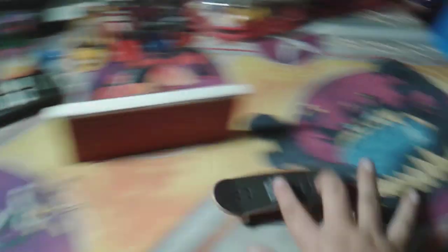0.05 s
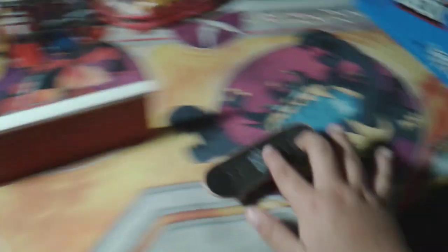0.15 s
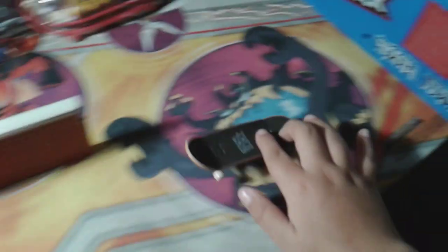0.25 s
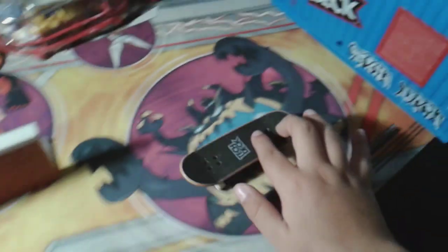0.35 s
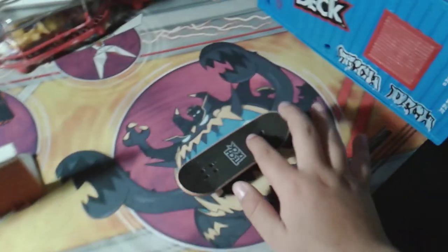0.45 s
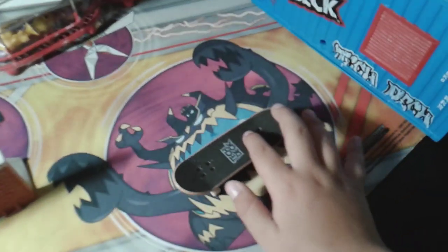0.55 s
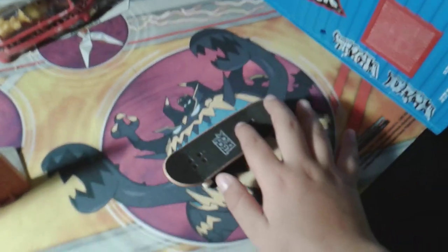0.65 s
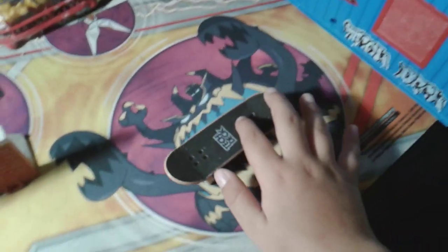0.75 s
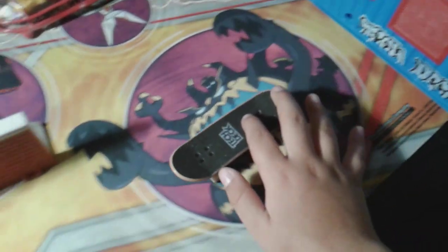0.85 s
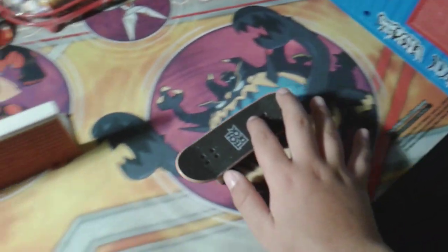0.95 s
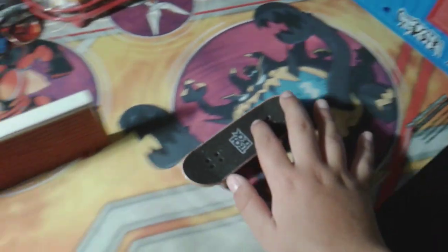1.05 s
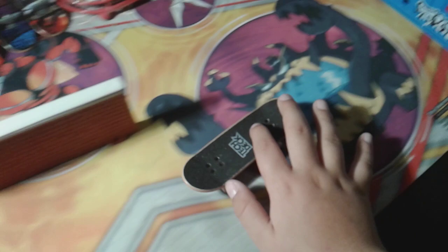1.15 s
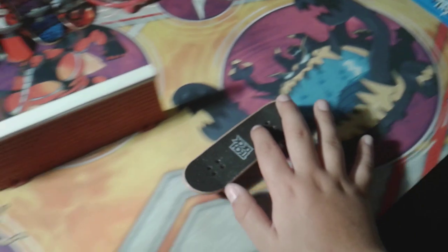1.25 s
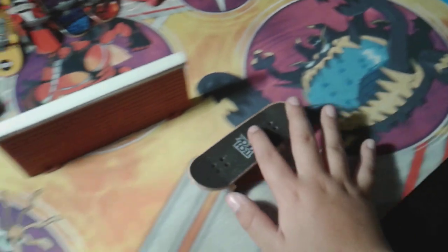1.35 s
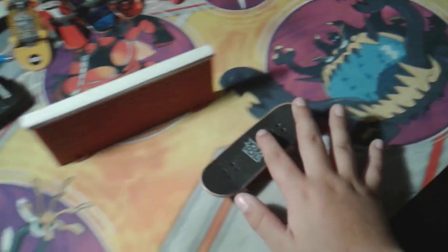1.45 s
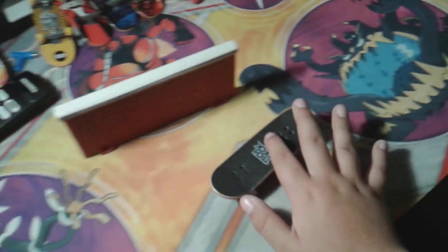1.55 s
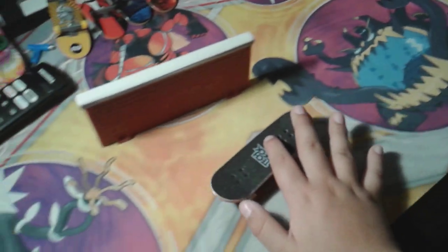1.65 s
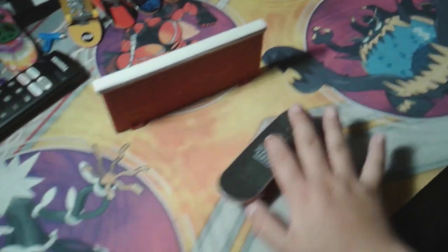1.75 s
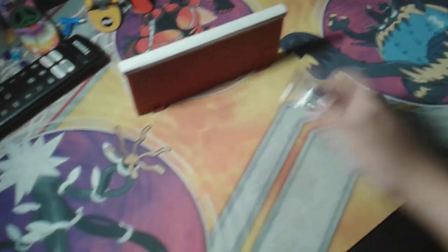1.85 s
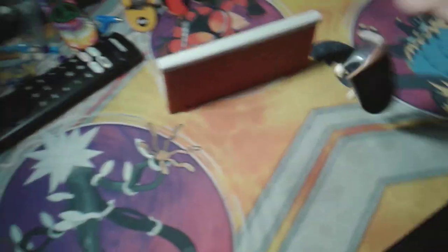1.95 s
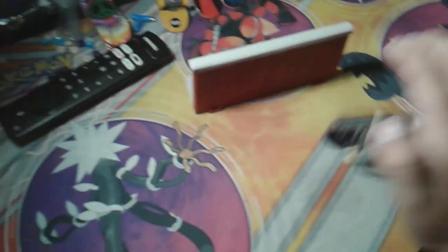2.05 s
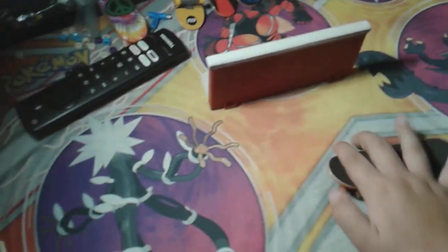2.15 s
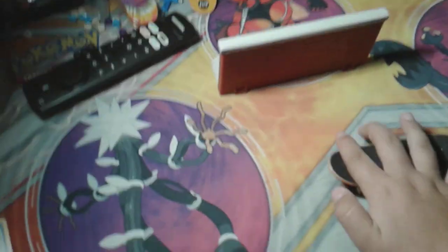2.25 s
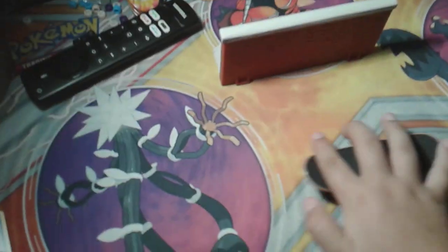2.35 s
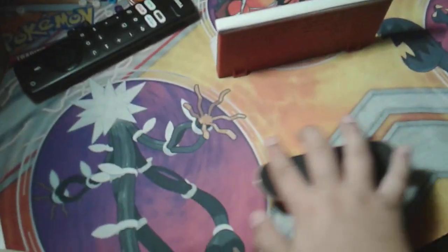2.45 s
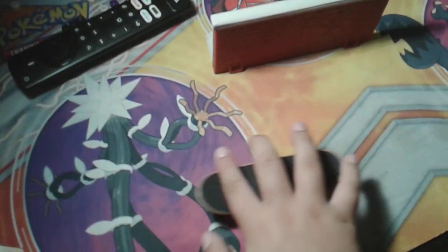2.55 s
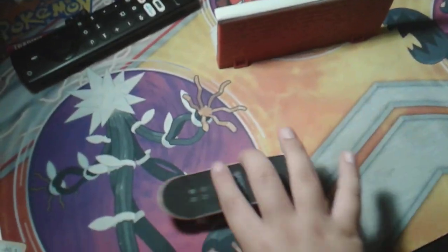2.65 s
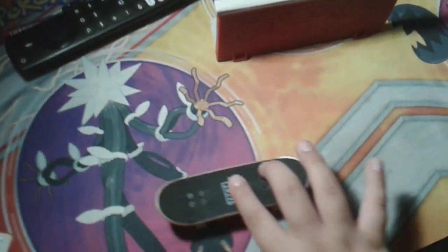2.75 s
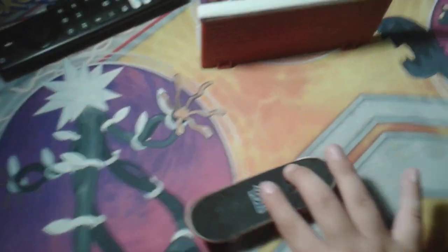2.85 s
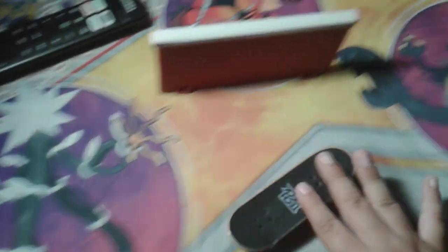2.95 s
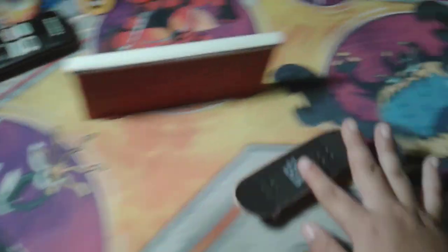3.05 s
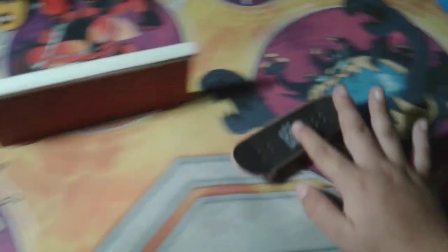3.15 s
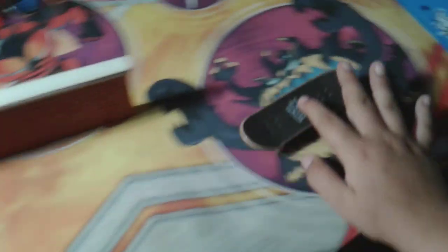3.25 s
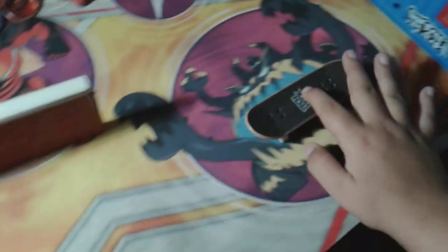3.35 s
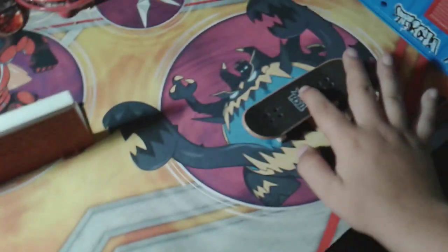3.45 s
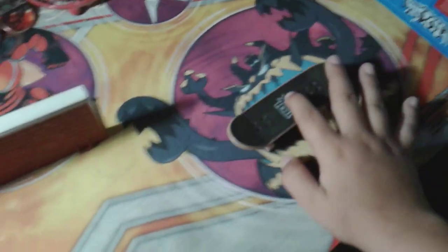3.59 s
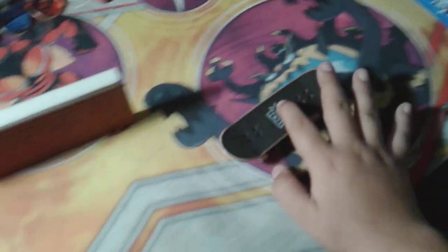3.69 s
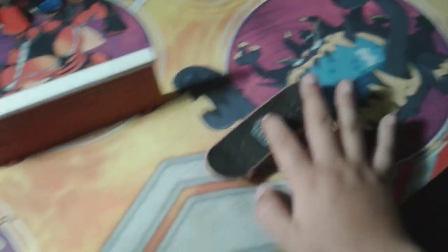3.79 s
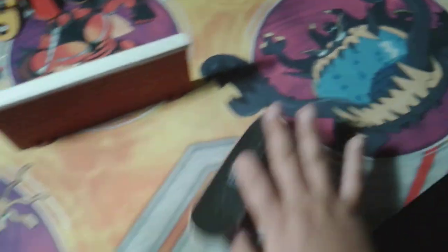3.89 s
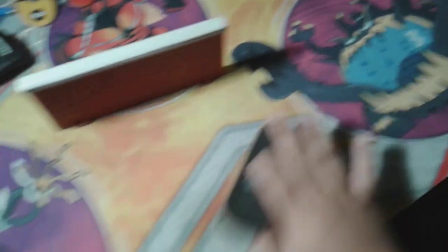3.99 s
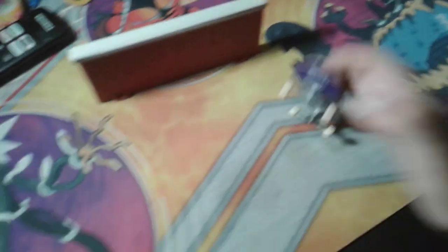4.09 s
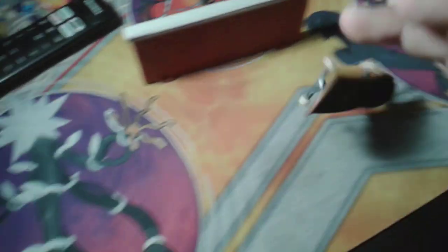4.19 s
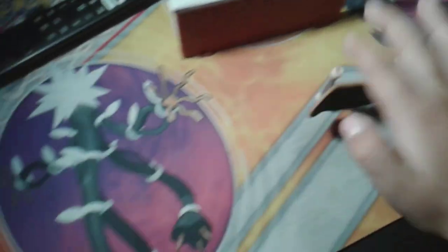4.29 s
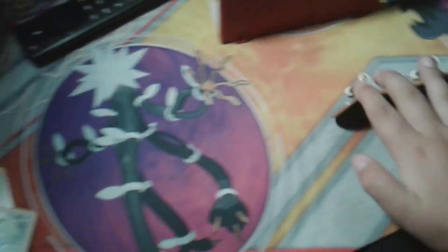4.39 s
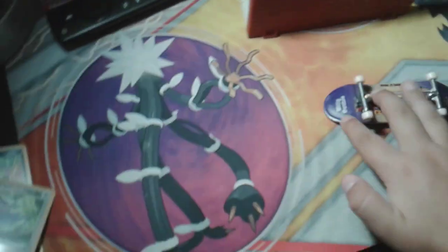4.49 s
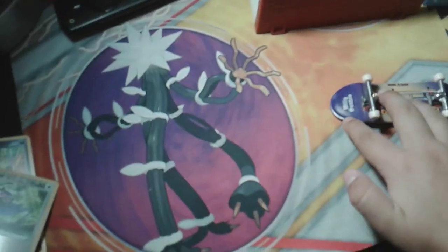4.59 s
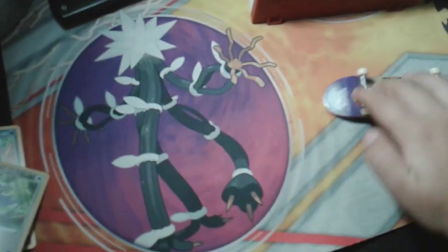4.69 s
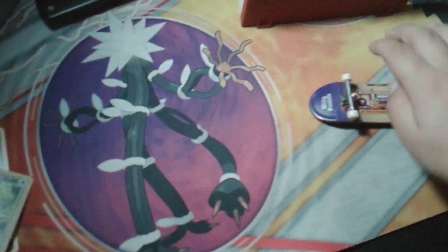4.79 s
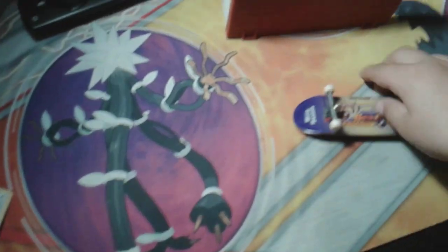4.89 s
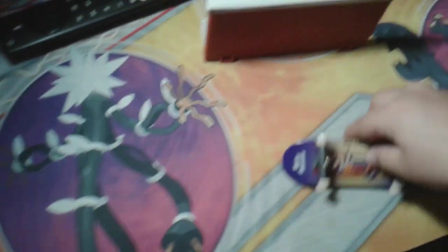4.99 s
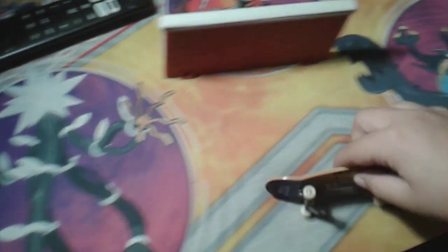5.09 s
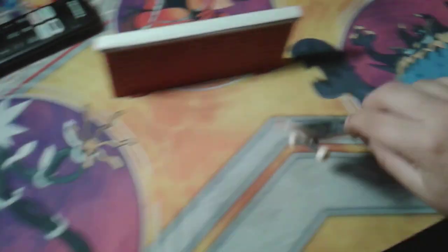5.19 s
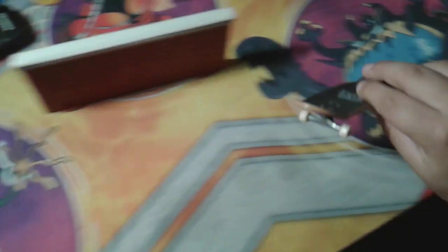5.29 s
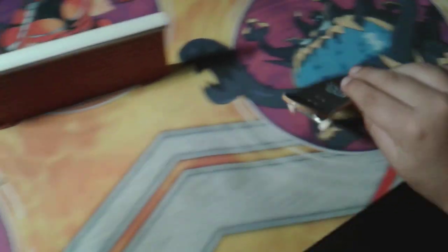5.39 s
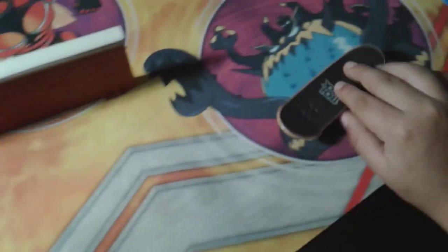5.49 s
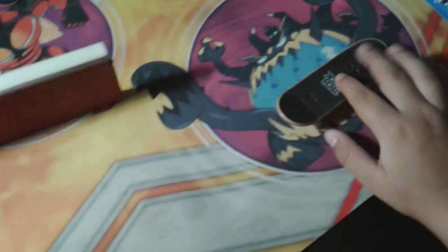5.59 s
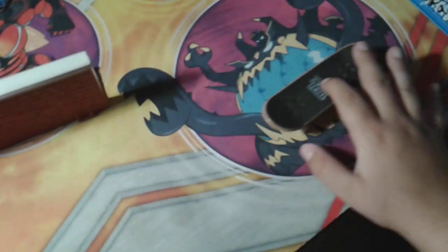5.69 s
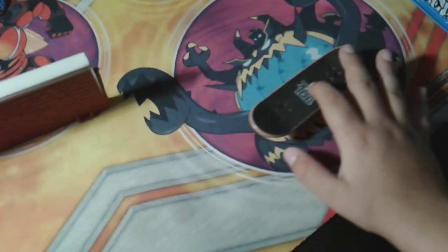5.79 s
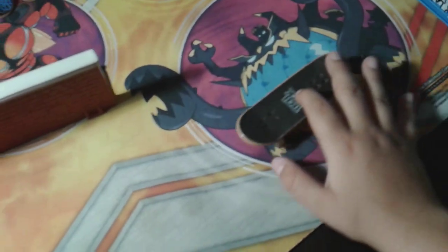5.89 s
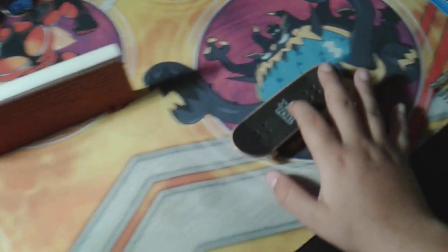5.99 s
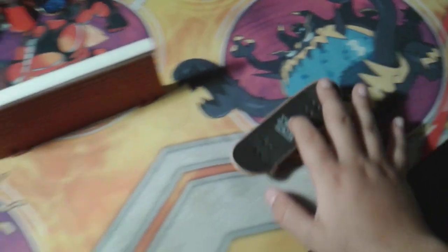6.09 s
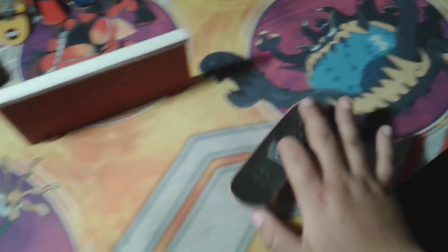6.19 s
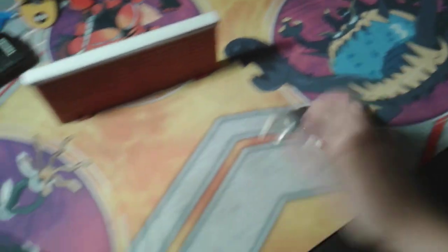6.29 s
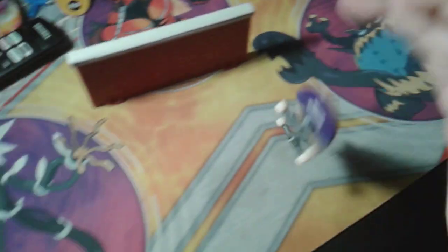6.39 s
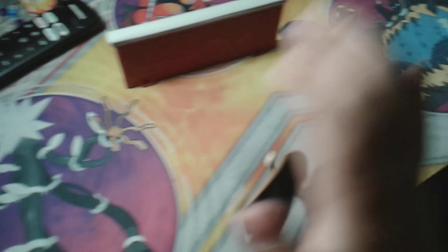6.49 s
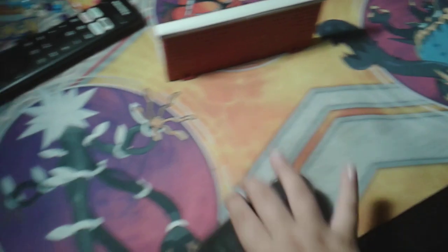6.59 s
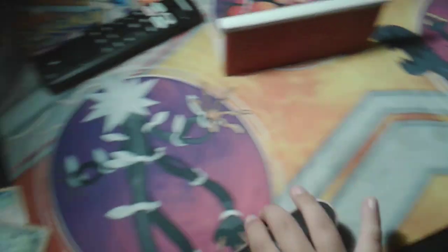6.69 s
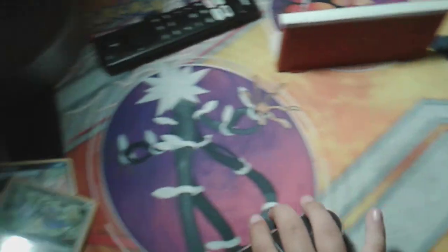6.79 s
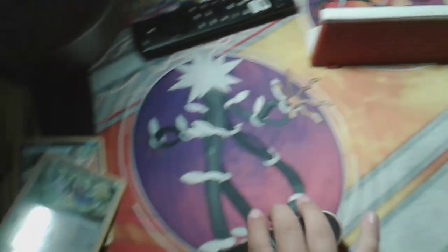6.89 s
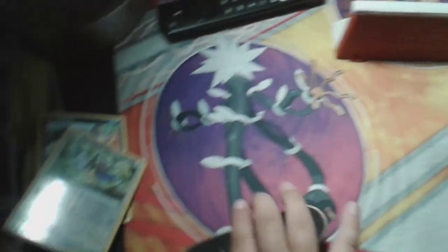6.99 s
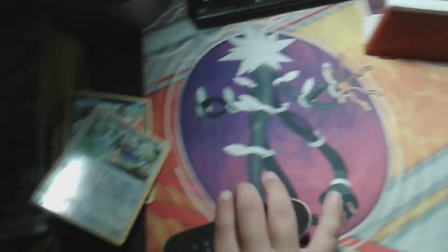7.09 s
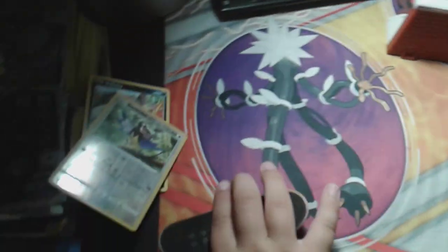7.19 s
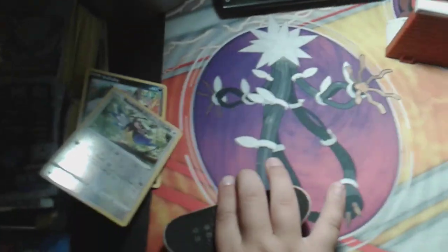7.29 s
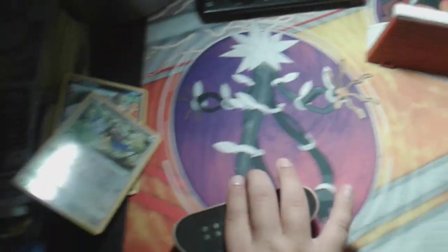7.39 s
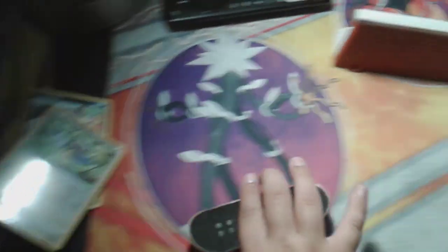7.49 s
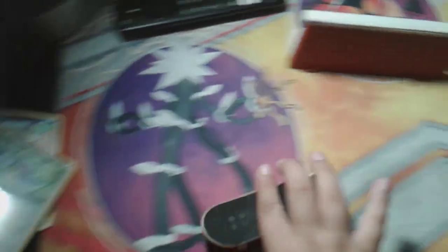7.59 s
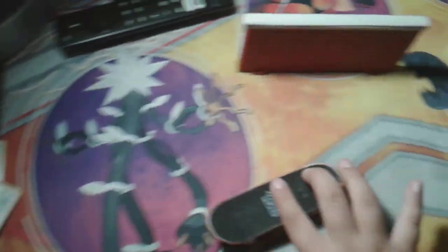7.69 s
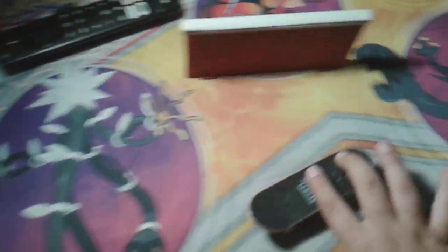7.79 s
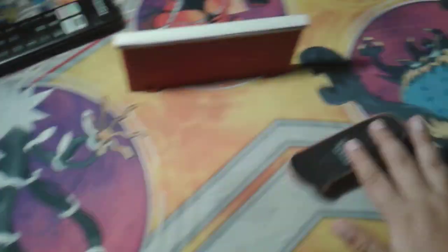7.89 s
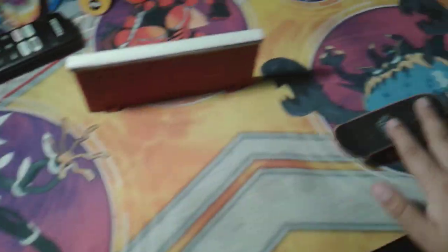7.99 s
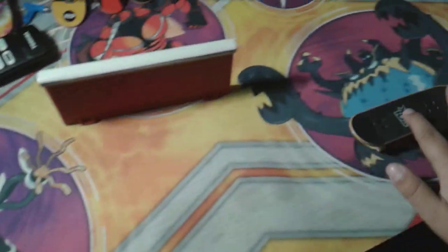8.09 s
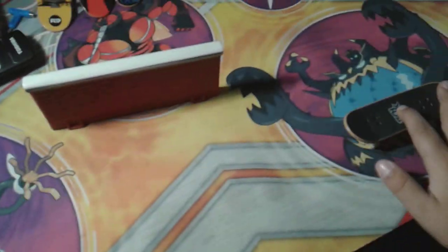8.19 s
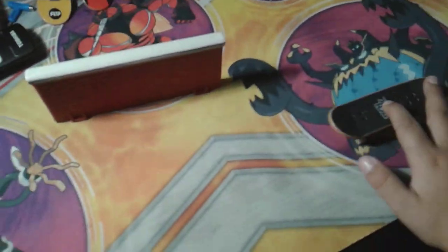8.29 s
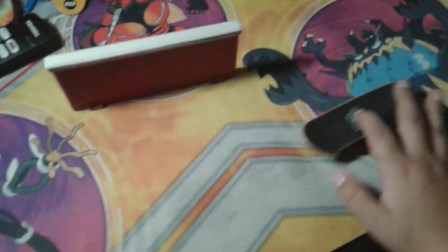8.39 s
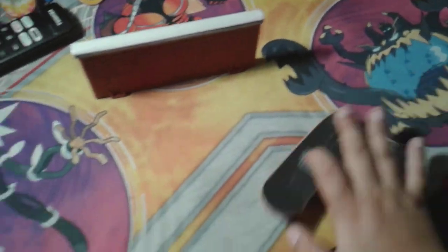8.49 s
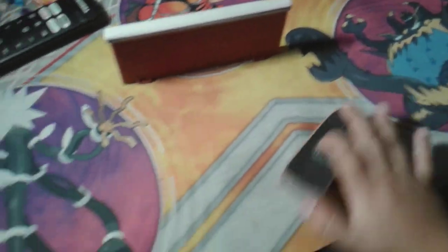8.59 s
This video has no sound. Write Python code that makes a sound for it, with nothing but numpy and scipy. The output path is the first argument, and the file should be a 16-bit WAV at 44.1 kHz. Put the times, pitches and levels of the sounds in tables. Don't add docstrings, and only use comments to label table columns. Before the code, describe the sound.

A small plastic toy skateboard is rolled, popped and dropped by fingers on a rubber mat over a wooden table. Faint rasping rolls and ticks come first, then a crisp double clack, later a louder, brighter landing, and a third rapid clatter. Softer scraping and one wheel rub end it. Close phone microphone, mono-like, small quiet room with low hum and light hiss.

```python
import sys
import numpy as np
from scipy import signal
from scipy.fft import rfft, irfft
from scipy.io import wavfile
from scipy.ndimage import uniform_filter1d

SR = 44100
rng = np.random.default_rng(int(sys.argv[2]) if len(sys.argv) > 2 else 0)


def ratio(d):
    e = np.asarray(d, float) / 20
    return 10 ** e


def wav_out(sig):
    wavfile.write(sys.argv[1], SR, np.round(np.clip(np.atleast_2d(sig).T, -1, 1) * 32767).astype(np.int16))


N = 381465

# pitch_hz, level_db, t60_s
THUD_MODES = [(102, -2.5, 0.045), (129.2, 5, 0.088), (148, -10, 0.03), (242.5, -13.5, 0.084)]
# pitch_hz, level_db (per Hz)
CRACK_COLOUR = [(1470, -30), (2500, -9), (4700, -8.5), (6920, 3), (7730, -3), (10000, -14.5),
                (11700, -16.5), (12500, -21.5), (15000, -19), (15900, -22.5), (16500, -43)]


def rms_one(x):
    return x / np.sqrt(np.mean(x ** 2) + 1e-20)


def band_pass(x, low_hz, high_hz):
    return signal.sosfilt(signal.butter(2, [low_hz, high_hz], "band", fs=SR, output="sos"), x)


def high_pass(x, hz, order=2):
    return signal.sosfilt(signal.butter(order, hz, "high", fs=SR, output="sos"), x)


def in_time(rows):
    s, *columns = np.transpose(rows)
    t = np.arange(N) / SR
    return np.array([np.interp(t, s, c, left=-200, right=-200) for c in columns])


def colour(x, spectrum):
    size = 4096
    hz, db = np.transpose(spectrum)
    bins_hz = np.arange(size // 2 + 1) * SR / size
    gain = ratio(np.interp(np.log(bins_hz + 1), np.log(hz), db))
    cepstrum = irfft(np.log(gain + 1e-6))
    cepstrum[1:size // 2] *= 2
    cepstrum[size // 2 + 1:] = 0
    response = irfft(np.exp(rfft(cepstrum)))
    return signal.fftconvolve(x, response / np.linalg.norm(response))[:len(x)]


def drift(rate_hz):
    r = np.exp(-2 * np.pi * rate_hz / SR)
    noise = rng.standard_normal(N + SR)
    return rms_one(signal.lfilter([1], [1, -2 * r, r * r], noise)[SR:])


def ring(clicks, hz, t60):
    r, w = ratio(-60 / (t60 * SR)), 2 * np.pi * hz / SR
    return signal.lfilter([0, np.sin(w)], [1, -2 * r * np.cos(w), r * r], clicks + 1e-18)


def resonate(x, peaks):
    out = 0
    for k, (hz, width_hz, db) in enumerate(peaks):
        r, w = np.exp(-np.pi * width_hz / SR), 2 * np.pi * hz / SR
        band = signal.lfilter([(1 - r * r) / 2, 0, (r * r - 1) / 2], [1, -2 * r * np.cos(w), r * r], x)
        flare_db = 3 * drift(28)
        out = out + (-1) ** k * ratio(db + flare_db) * band
    return rms_one(out)


def grit(per_s, spread_db):
    sizes = ratio(spread_db * np.minimum(rng.exponential(1, N), 4)) * rng.choice([-1, 1], N)
    return rms_one(sizes * (rng.random(N) < per_s / SR))


def through_deck(burst):
    return 1.26 * band_pass(burst, 900, 4000)


def contacts():
    # start_s, crack_db, thud_db, wood_ring_db, deck_edge_db
    blow_events = [(0.4622, -43.5, -41, -52.5, -52), (0.5025, -64, -46.5, -48.5, -51),
                   (1.943, -49.5, -34.5, -43, -44), (2.1544, -41.5, -30.5, -39.5, -52),
                   (2.1846, -23, -29.5, -30, -27.5), (2.2446, -26.5, -38, -57, -34),
                   (2.262, -35, -40, -61, -42), (4.1553, -41, -40.5, -43, -43),
                   (4.326, -40.5, -47, -41, -46), (4.357, -25.5, -30.5, -23.5, -31),
                   (4.4388, -14.5, -22, -18, -37), (4.5216, -43, -48.5, -45, -50),
                   (4.546, -42, -64, -44, -44), (4.5611, -37.5, -40, -45, -46.5),
                   (5.5957, -36.5, -40, -47, -54.5), (5.6404, -44, -41.5, -61.5, -54),
                   (6.406, -39, -35.5, -40, -52), (6.6055, -35, -33, -40, -44.5),
                   (6.6547, -28, -27.5, -36, -35), (6.714, -30, -44, -56, -48),
                   (6.7243, -20, -27, -29, -23.5), (6.7399, -28, -41.5, -52.5, -49),
                   (6.792, -44.5, -51.5, -56, -44), (8.0581, -47.5, -46, -48.5, -42)]
    # start_s, crack_db, wood_db
    click_events = [(0.5419, -56.5, -65), (1.556, -59, -59), (1.999, -50.5, -58), (2.301, -50, -57.5),
                    (4.001, -53.5, -59.5), (4.216, -56, -58.5), (4.5982, -43.5, -62),
                    (5.0255, -57.5, -62.5), (5.1315, -56, -73), (5.166, -59, -61.5), (5.4812, -50, -62),
                    (5.5103, -50, -67), (5.522, -39.5, -55.5), (6.4578, -52, -59), (6.6763, -34.5, -47),
                    (6.7007, -40.5, -64), (6.821, -45.5, -65), (6.866, -50, -60), (6.9577, -51.5, -66)]
    # start_s, thud_db, deck_edge_db
    bump_events = [(1.418, -51.5, -66), (1.536, -47.5, -54), (2.8406, -51.5, -77), (4.9614, -36.5, -54.5),
                   (7.556, -49.5, -67), (7.7903, -47.5, -77), (7.973, -49, -51), (8.075, -55, -45),
                   (8.398, -58, -76)]
    body_db, body_grows, hard_db = -21, 1.34, -23
    blows = [(s, crack, thud, wood, body_db + body_grows * (wood - hard_db), edge)
             for s, crack, thud, wood, edge in blow_events]
    clicks = [(s, crack, wood + 4.5, wood - 0.5, wood - 3, wood) for s, crack, wood in click_events]
    bumps = [(s, thud - 12, thud, thud - 24, thud - 21, edge) for s, thud, edge in bump_events]
    return np.array(sorted(blows + clicks + bumps))


def strike(modes, levels_db, spread_db, contact_s, lead_s):
    at = ((contacts()[:, 0] - lead_s) * SR).astype(int)
    luck, out = rng.standard_normal((len(at), len(modes))), np.zeros(N)
    for k, (hz, db, t60) in enumerate(modes):
        clicks = np.zeros(N)
        clicks[at] = ratio(levels_db + db + spread_db * luck[:, k])
        out += (-1) ** k * ring(clicks, hz, t60)
    soft = np.exp(-1 / (contact_s * SR))
    return signal.lfilter([(1 - soft) ** 2], [1, -2 * soft, soft * soft], out)


def chatter(levels_db, rise_s, t60):
    blows = np.zeros(N)
    blows[((contacts()[:, 0] - rise_s) * SR).astype(int)] = ratio(levels_db)
    t = np.arange(SR // 8) / SR
    shape = ratio(-60 * t / t60) * np.minimum(t / rise_s, 1) ** 2
    return np.abs(signal.fftconvolve(blows, shape)[:N]) * grit(per_s=14000, spread_db=5.5)


def knocks():
    # pitch_hz, level_db, t60_s
    edge_modes = [(1240, -3.5, 0.022), (1630, -3, 0.022), (1790, -5.5, 0.032), (2300, 5, 0.011),
                  (2600, -10, 0.074), (2550, -1.5, 0.02), (3240, -21.5, 0.031), (3959, -7.5, 0.012)]
    # pitch_hz, level_db, t60_s
    body_modes = [(636, -18, 0.08), (730, -1, 0.04), (809, -0.5, 0.069), (849, -6.5, 0.086),
                  (910, -9, 0.09), (1070, -6, 0.057), (1230, -9.5, 0.036)]
    # pitch_hz, level_db, t60_s
    wood_modes = [(315.6, -5.5, 0.16), (340, -1, 0.11), (451, -3.5, 0.089), (506, -15.5, 0.068)]
    s, crack_db, thud_db, ring_db, body_db, edge_db = contacts().T

    crack = colour(chatter(crack_db - 3.5, rise_s=0.00047, t60=0.035), CRACK_COLOUR)
    top = high_pass(crack, 3700)
    top_gain = ratio(np.minimum(0.26 * (crack_db + 29), 0))
    latest = np.maximum(np.searchsorted(s - 0.002, np.arange(N) / SR) - 1, 0)
    crack += top * (top_gain[latest] - 1)

    edge = strike(edge_modes, edge_db - 7.5, spread_db=5, contact_s=0.00003, lead_s=0.00161)
    edge += through_deck(chatter(edge_db - 2, rise_s=0.0029, t60=0.0069))

    body = strike(body_modes, body_db - 7.5, spread_db=4, contact_s=0.00006, lead_s=0.002)
    body += band_pass(chatter(body_db, rise_s=0.0015, t60=0.093), 420, 1400)

    table = strike(THUD_MODES, thud_db + 2, spread_db=3.5, contact_s=0.00031, lead_s=0.00061)
    table += strike(wood_modes, ring_db + 0.5, spread_db=1.5, contact_s=0.00026, lead_s=0.002)
    return crack + edge + body + table


def deck_notes():
    # start_s, peak_db, edge_hz, body_hz, snap_db
    knock_notes = [(0.462, -41.5, 3400, 613, -69), (1.9415, -35, 1790, 755, -82),
                   (2.153, -39, 1660, 592, -49), (2.1856, -21, 2650, 734, -21),
                   (2.2442, -29.5, 3500, 1226, -20), (4.154, -38, 1809, 762, -70),
                   (4.323, -40.5, 1850, 734, -65), (4.359, -25, 2510, 683, -27),
                   (4.4393, -21, 2830, 779.3, -14.5), (5.598, -43, 1890, 887, -57),
                   (6.407, -41.5, 2593, 817, -49), (6.604, -43, 2450, 556, -58),
                   (6.656, -28.5, 2600, 552, -59), (6.7261, -19.5, 2300, 910, -55)]
    out, t = np.zeros(N), np.arange(SR // 10) / SR
    snaps = high_pass(rng.standard_normal((len(knock_notes), len(t))), 9000)
    for (s, db, edge_hz, body_hz, snap_db), snap in zip(knock_notes, snaps):
        i = int((s - 0.0015) * SR)
        edge = ratio(db + 1 - 60 * t / 0.013) * np.sin(2 * np.pi * edge_hz * t)
        body = ratio(db - 12 - 60 * t / 0.066) * np.sin(2 * np.pi * body_hz * t)
        snap = ratio(snap_db - 6 - 60 * t / 0.022) * snap
        out[i:i + len(t)] += (edge + body + snap) * np.minimum(t / 0.0017, 1)
    return out


def taps():
    # start_s, level_db,
    # pitch_hz, t60_s
    single_notes = [(.463, -45, 2530, 0.02), (.465, -42.5, 335, 0.069), (.503, -54, 865, 0.07),
                        (1.54, -50, 138, 0.087), (2.173, -39, 1790, 0.016), (2.184, -22.5, 8300, 0.012),
                        (2.186, -25.5, 7500, 0.019), (2.245, -28, 8100, .015), (2.301, -47, 2100, 0.02),
                        (4.3547, -26, 438, 0.045), (4.3555, -24, 770, 0.019), (4.358, -33.5, 998, 0.091),
                        (4.375, -39, 572, 0.09), (4.373, -47, 950, .06), (4.41, -41, 1800, 0.018),
                        (4.439, -37, 1050, 0.056), (4.461, -59, 130.1, 0.18), (4.522, -49, 1760, 0.024),
                        (4.437, -26, 325.8, 0.16), (4.963, -41, 85.4, 0.15), (4.975, -59, 1900, 0.035),
                        (5.0, -64.5, 2400, 0.029), (5.481, -56, 800, .04), (5.488, -56, 2360, .03),
                        (5.511, -52.5, 2500, .015), (5.511, -50, 3620, .015), (5.523, -39.5, 137, 0.043),
                        (5.596, -52, 3130, .015), (5.599, -52, 1370, .03), (5.622, -40, 131, 0.051),
                        (5.624, -59, 1400, .04), (5.624, -62, 1980, .04), (6.405, -50.5, 1410, 0.029),
                        (6.43, -46, 124, 0.21), (6.604, -36.5, 413, 0.045), (6.656, -33.5, 411, 0.093),
                        (6.66, -48, 556, .04), (6.727, -35, 957, 0.04), (6.732, -35, 410, 0.056),
                        (6.674, -48, 2250, .015), (6.713, -35, 2300, .012), (6.724, -16, 3140, 0.013),
                        (6.739, -37.5, 2400, 0.011), (7.973, -62, 3250, .02), (8.059, -38, 106, 0.11),
                        (8.053, -48, 1610, 0.028), (8.073, -47.5, 1790, .025), (8.074, -51, 1240, 0.028),
                        (1.552, -55, 1900, 0.017), (1.553, -58, 4500, 0.011), (7.808, -65, 3800, .015),
                    (7.873, -49, 4800, 0.016), (7.895, -51, 7200, .012), (7.896, -62, 4700, .012),
                    (7.96, -60, 5850, .02), (7.998, -59, 4500, .012), (8.075, -52, 4200, .012),
                    (8.075, -56, 7700, .01), (8.148, -56, 4060, 0.016), (3.9063, -64, 1800, .02),
                    (3.9866, -63, 1560, .02), (3.999, -54, 2200, .015), (8.549, -55, 2220, .015),
                    (8.592, -53, 1900, .02), (8.6165, -41, 2190, .015), (0.23, -54, 1800, .015),
                    (.197, -64, 3500, .01), (4.386, -38, 715, 0.047), (4.392, -43, 990, .03),
                    (4.4, -42, 500, .04), (4.418, -52, 720, 0.06), (4.442, -33, 120, 0.025),
                    (4.358, -29, 240, 0.034), (4.4388, -15, 7900, .014), (4.44, -28.5, 1150, 0.027),
                    (2.244, -45, 850, 0.031), (1.941, -44.5, 2650, .02), (5.522, -41.5, 5000, 0.017),
                    (4.505, -43, 310, 0.16), (4.456, -34, 760, .03), (4.47, -40, 1050, .04),
                    (7.977, -44, 105, .08), (8.042, -52, 6900, .012), (8.076, -46, 6700, .012),
                    (8.058, -59, 265, .05), (8.061, -64, 362, .05)]
    events = single_notes
    out, t = np.zeros(N), np.arange(SR // 6) / SR
    shakes = 9 * uniform_filter1d(rng.standard_normal((len(events), len(t))), size=81)
    for (s, db, hz, t60), shake in zip(events, shakes):
        i = int(s * SR)
        rough = np.clip(hz / 1000 - 1, 0, 0.7)
        level = np.sqrt(1 - rough ** 2) + rough * shake
        note = level * ratio(db - 60 * t / t60) * np.sin(2 * np.pi * hz * t)
        out[i:i + len(t)] += (note * np.minimum(t / 0.0011, 1))[:N - i]
    return out


def strokes():
    # start_s, level_db
    stroke_curves = [
        [(0.0, -68.5), (0.072, -75.5), (0.096, -64), (0.128, -68), (0.214, -60), (0.4, -90)],
        [(2.93, -99), (3.05, -58.5), (3.11, -58.5), (3.238, -68), (3.266, -62.5), (3.288, -70), (3.36, -69.5),
         (3.46, -88.5)],
        [(3.85, -89), (3.886, -81), (4.026, -60.5), (4.086, -82), (4.12, -82)],
        [(7.02, -81), (7.138, -71.5), (7.178, -60), (7.268, -81.5), (7.3, -89.5)],
        [(7.72, -95), (7.792, -93), (7.806, -62.5), (7.95, -57.5), (8.072, -49), (8.138, -66), (8.2, -75.5)],
        [(8.44, -84), (8.584, -62), (8.6, -59.5), (8.636, -57), (8.65, -85)],
    ]
    # axle_buzz_db, deck_drone_db, table_rumble_db
    grips = [(-21, -2, 0), (-13.5, -0.5, -2.5), (-8, 1.5, -1), (-10, -6.5, 1.5), (-12, -3, 3.5),
             (-5, 3.5, 2.5)]
    firm_db, gains = -72, 0
    for stroke, (buzz_db, drone_db, rumble_db) in zip(stroke_curves, grips):
        over = in_time(stroke)[0] - firm_db
        layers = [over, buzz_db + 0.97 * over, drone_db + 0.77 * over, rumble_db + 0.61 * over]
        gains = gains + ratio(firm_db + np.array(layers))
    return gains


def whine():
    # start_s, end_s, level_db, pitch_hz
    whines = [(.095, 0.125, -67, 1850), (0.19, 0.208, -64, 1700), (0.226, .25, -74, 2220),
              (0.518, 0.528, -64, 2540), (3.023, 3.088, -58, 1840), (3.038, 3.076, -62, 2880),
              (3.103, 3.13, -64, 1870), (3.116, 3.137, -64, 1570), (3.155, 3.243, -66, 1680),
              (3.215, 3.28, -65, 2250), (3.30, 3.353, -71, 2300), (3.253, 3.285, -72, 1850),
              (3.96, 4.04, -72, 2070), (6.408, 6.484, -65.5, 2550), (6.458, 6.477, -64, 1800),
              (7.932, 7.977, -56.5, 1833), (7.996, 8.02, -53.5, 1920), (7.161, 7.21, -68, 5200),
              (3.92, 3.96, -68, 2150), (7.82, 7.912, -74, 2400), (8.562, 8.645, -67, 1960),
              (8.603, 8.638, -52, 1350)]
    width_hz, line, fade_s = 150, 0.5, 0.015
    t, out = np.arange(N) / SR, 0
    wander = np.cumsum(40 * drift(16.5)) / SR
    even, odd = drift(width_hz), drift(width_hz)
    for start, end, db, hz in whines:
        phase = 2 * np.pi * (hz * t + wander)
        on = np.clip(np.minimum(t - start, end - t) / fade_s + 0.5, 0, 1)
        out = out + ratio(db) * on * ((line + even) * np.cos(phase) + odd * np.sin(phase)) / 2
    return out


def rolling():
    # pitch_hz, width_hz, level_db
    rasp_peaks = [(5610, 490, 1), (6700, 840, 8), (7500, 1160, 0), (10900, 10000, -24)]
    buzz_peaks = [(3860, 920, 0), (4870, 990, 0)]
    drone_peaks = [(1870, 340, -5.5), (2300, 440, -8), (2830, 890, -12.5), (740, 1100, -12)]
    rasp, buzz, drone, _ = strokes()
    lumps = drift(49)
    catches = grit(per_s=150, spread_db=-1)
    wheels = resonate(grit(per_s=2800, spread_db=3) + 0.43 * catches, rasp_peaks)
    axles = resonate(grit(per_s=2200, spread_db=2.5) + 0.6 * catches, buzz_peaks)
    deck = resonate(grit(per_s=3400, spread_db=2) + 0.5 * catches, drone_peaks)
    rasp = rasp * ratio(-4 + 1.1 * lumps) * wheels
    buzz = buzz * ratio(-1 + 3 * lumps) * axles
    drone = drone * ratio(-3 + 2 * lumps + 0.95 * drift(21)) * deck
    return rasp + buzz + drone + ratio(2 * lumps) * whine()


def skids():
    # start_s, end_s, rasp_db, deck_db
    skid_events = [(0.505, 0.561, -68, -64), (1.54, 1.576, -80, -66), (1.87, 1.911, -73, -71),
                   (1.938, 1.984, -61.5, -59), (1.984, 2.04, -65, -80), (6.286, 6.31, -70, -82),
                   (2.168, 2.187, -41.5, -58), (2.22, 2.261, -46.5, -52), (2.237, 2.338, -56, -58),
                   (4.146, 4.255, -74, -64), (4.212, 4.234, -57.5, -78), (4.37, 4.445, -56.5, -55),
                   (4.514, 4.547, -51.5, -63), (6.447, 6.472, -66, -69), (4.428, 4.44, -31, -58),
                   (4.541, 4.601, -51, -54.5), (4.953, 5.104, -73.5, -66), (5.125, 5.204, -83, -73),
                   (4.446, 4.515, -54, -66), (5.018, 5.048, -65, -72), (5.16, 5.194, -63.5, -70),
                   (5.252, 5.281, -69, -82), (5.477, 5.534, -63, -61.5), (5.612, 5.662, -63, -67),
                   (6.403, 6.5, -64.5, -65), (6.601, 6.663, -70, -66), (6.752, 6.807, -61.5, -55),
                   (6.646, 6.701, -50, -50), (6.72, 6.752, -52, -28), (6.794, 6.832, -71, -54)]
    t, rasp, deck = np.arange(N) / SR, 0, 0
    for start, end, rasp_db, deck_db in skid_events:
        on = np.clip((t - start) / 0.0077, 0, 1) * np.clip((end - t) / 0.03, 0, 1)
        on = on * ratio(-45 * np.abs(t - start))
        rasp = rasp + ratio(rasp_db) * on
        deck = deck + ratio(deck_db) * on
    clumps = ratio(3.74 * drift(120))
    deck = deck * grit(per_s=3400, spread_db=1)
    wheels = colour(rasp * grit(per_s=1800, spread_db=0), CRACK_COLOUR)
    return clumps * (wheels + through_deck(deck) + 0.03 * ring(deck, 2300, 0.015))


def ticks(events):
    out, t = np.zeros(N), np.arange(SR // 40) / SR
    scratches = rng.standard_normal((len(events), len(t))) * ratio(-60 * t / 0.016) * np.minimum(t / 0.0004, 1)
    for (s, db, hz), scratch in zip(events, scratches):
        i = int(s * SR)
        scratch = band_pass(scratch, 0.72 * hz, 1.3 * hz)
        tick = 0.1 * ring(scratch, hz, 0.002) + 0.4 * scratch
        out[i:i + len(t)] += ratio(db - 7) * tick / np.abs(tick).max()
    return out


def more_ticks():
    # start_s, peak_db, pitch_hz
    more_tick_events = [(.122, -57, 6500), (.5025, -48, 7300), (.5105, -46, 7250), (.5275, -48, 7200),
                        (3.057, -58, 7700), (3.076, -52, 6700), (3.184, -53, 6600), (3.27, -59, 7200),
                        (7.847, -55, 6700), (7.932, -54, 6900), (8.592, -42, 6940)]
    return ticks(more_tick_events)


def loose_parts():
    # start_s, peak_db, pitch_hz
    loose_ticks = [(.082, -41, 6700), (.094, -37, 6700), (.107, -48, 6100), (.132, -52, 5900),
                   (2.522, -60, 4800), (2.703, -62, 4300), (2.75, -62, 6000),
                   (0.159, -56, 6530), (0.2059, -50, 6570), (0.244, -45, 6600), (0.272, -53, 6430),
                   (0.8055, -48, 4840), (1.348, -58, 4700), (1.831, -54.5, 6600), (1.921, -61, 6500),
                   (2.4668, -49.5, 6100), (2.5666, -59, 4650), (2.613, -49.5, 7100), (2.676, -57, 4220),
                   (2.9756, -54.5, 6640), (3.7369, -60, 3810), (3.8083, -57.5, 4740), (3.879, -52, 7300),
                   (3.9614, -55, 4880), (4.625, -46.5, 6900), (4.646, -51, 5980), (4.8, -56, 7110),
                   (5.2538, -64, 6800), (6.2834, -55.5, 7060), (6.327, -50, 7500), (6.946, -50, 6590),
                   (7.5256, -55.5, 6200), (7.648, -54, 6060), (7.805, -57, 6770), (8.147, -54, 7140),
                   (8.5175, -58, 6000), (8.548, -44.5, 6500)]
    return ticks(loose_ticks)


def shifting():
    # start_s, level_db
    hand_curve = [(0.0, -79), (0.55, -73.5), (1.08, -83), (1.93, -78), (2.31, -69), (2.99, -76.5),
                  (3.2, -68), (3.42, -79.5), (3.83, -75.5), (4.07, -67.5), (4.74, -71), (5.42, -80.5),
                  (5.61, -80), (6.7, -64), (7.39, -75), (7.98, -70.5), (8.2, -75.5), (8.65, -76)]
    # pitch_hz, width_hz, level_db
    rustle_peaks = [(2100, 1000, 2.5), (7140, 1500, -3)]
    hand_db, = in_time(hand_curve)
    rustle = ratio(hand_db - 8 + 1.3 * drift(39)) * resonate(grit(per_s=4300, spread_db=3.5), rustle_peaks)

    bumps = grit(per_s=120, spread_db=3)
    slow_modes = [(69.5, 4, 0.25), (157.4, -4, 0.53), (280.8, -12.5, 0.41), (324, -15, 0.13)]
    rumble = sum(ratio(db) * ring(bumps, hz, 0.3 * t60) for hz, db, t60 in THUD_MODES + slow_modes)

    shudder_db, shudder_t60_s = -30, 0.3
    s, _, thud_db, *_ = contacts().T
    thuds = np.zeros(N)
    thuds[(s * SR).astype(int)] = ratio(thud_db + shudder_db)
    shudder = signal.lfilter([1], [1, -ratio(-60 / (shudder_t60_s * SR))], thuds + 1e-18)
    hand = ratio(-66 + 0.4 * (hand_db - hand_db.mean()))
    return rustle + ratio(2.5) * (hand + strokes()[3] + shudder) * rms_one(rumble)


def room(t60, hold_s):
    # pitch_hz, level_db (per Hz)
    tail_colour = [(120, -39), (200, -7.5), (360, -3.5), (722, -15), (1040, -17.5), (1480, -25),
                   (1740, -21.5), (3760, -32.5), (7540, -19), (8900, -29), (16000, -45)]
    s, crack_db, *_ = contacts().T
    blows = np.zeros(N)
    blows[(s * SR).astype(int)] = ratio(crack_db)
    t = np.arange(SR // 3) / SR
    shape = ratio(-60 * t / t60) * np.minimum(t / 0.0007, 1) / (1 + (t / hold_s) ** 8)
    tail = colour(rng.standard_normal(len(t)), tail_colour) * shape
    return signal.fftconvolve(blows, tail / np.linalg.norm(tail))[:N]


def hum():
    # pitch_hz, level_db (per Hz)
    hum_colour = [(15, -28.5), (25, 3), (43, -11), (70, -4.5), (149, -6.5), (212, -14), (354, -18.5),
                  (591, -23), (2280, -32), (4610, -47.5), (6920, -39.5), (9070, -41), (14800, -38.5),
                  (16000, -44)]
    noise = ratio(-66.5) * rms_one(colour(rng.standard_normal(N), hum_colour))
    low = signal.sosfilt(signal.butter(1, 900, fs=SR, output="sos"), noise)
    return noise - low + low * ratio(2 * drift(2))


def scene():
    bright = knocks() + deck_notes() + taps() + more_ticks()
    soft = rolling() + skids() + loose_parts() + shifting()
    soft = soft + ratio(10.5) * room(t60=0.24, hold_s=0.15) + hum()
    soft = signal.sosfilt(signal.cheby2(20, 50, 16100, fs=SR, output="sos"), soft)
    mono = bright + soft
    return np.array([mono, mono])


def top_cut(x):
    return signal.sosfilt(signal.butter(12, 16850, fs=SR, output="sos"), x)


def record(dry):
    x = high_pass(0.44 * np.tanh(dry / 0.46), 62, order=4)
    delay = np.gradient(uniform_filter1d(x[0], size=9) * drift(400))
    jitter = x[0] * rng.standard_normal(N)
    mismatch = ratio(-24.5) * delay + ratio(-43.5) * jitter + ratio(-30.5) * band_pass(jitter, 4500, 7500)
    x = x + mismatch * [[1], [-1]]
    x = signal.sosfilt(signal.cheby2(14, 60, 16850, fs=SR, output="sos"), x)
    return top_cut(x - 0.0005)


dry = scene()
out = record(dry)
wav_out(out)
```